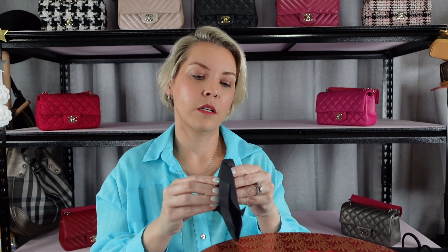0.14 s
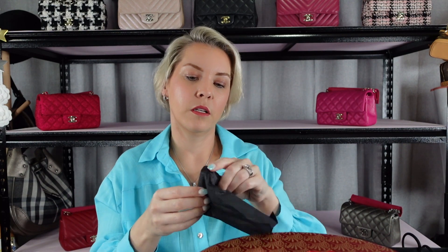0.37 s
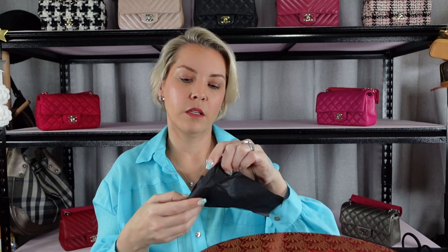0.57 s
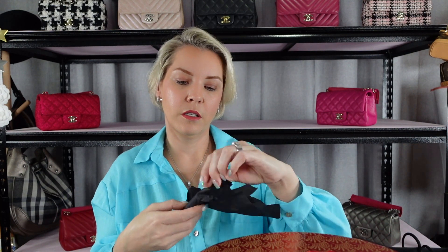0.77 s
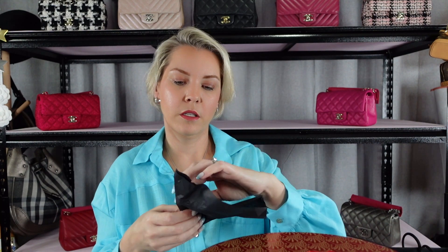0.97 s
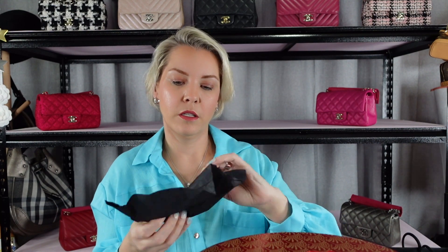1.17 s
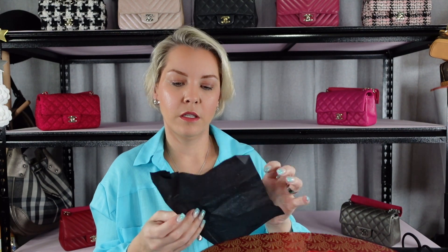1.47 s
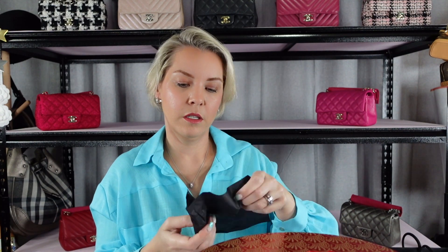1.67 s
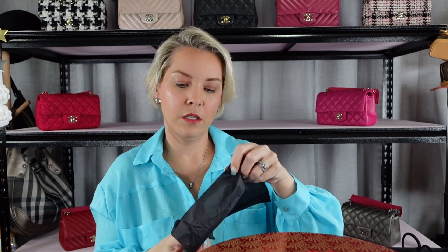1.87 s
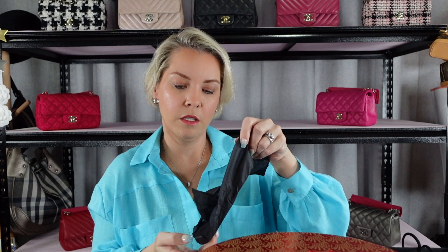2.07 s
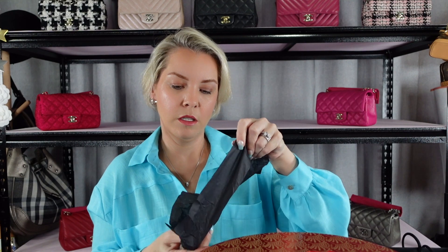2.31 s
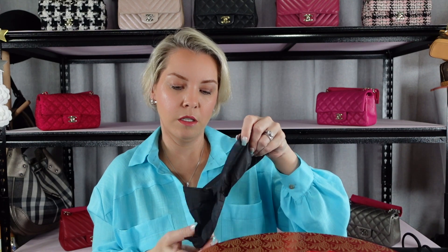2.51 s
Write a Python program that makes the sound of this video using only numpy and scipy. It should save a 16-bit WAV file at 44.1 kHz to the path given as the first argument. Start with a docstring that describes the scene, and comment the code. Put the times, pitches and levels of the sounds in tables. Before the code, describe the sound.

Dry, bright paper rustle in uneven flurries, with tiny pops and sharp crease snaps, drops away for a moment, then surges strongly and continues fuller; close pickup, short indoor reflections, very faint low room rumble.

```python
"""A sheet of thin tissue paper is unfolded by hand in a small room, with a brief pause before the widest pull.
Creases buckle in flurries of random impulses through damped resonators, over the filtered noise of sliding layers.
Middling creases pop singly; stiff ones snap and set off runs of smaller snaps. Pockets of air between layers resonate.
The bass grows fuller towards the end; reflections shift as the sheet moves, over a low room rumble."""
import sys
import numpy as np
from scipy import signal
from scipy.fft import rfft, irfft
from scipy.io import wavfile

SR = 44100
rng = np.random.default_rng(int(sys.argv[2]) if len(sys.argv) > 2 else 0)


def bounce(signal):
    """Save signal as a 16-bit WAV file at the path given by the first command-line argument."""
    frames = np.transpose(np.atleast_2d(signal))
    limited = np.clip(frames, -1, 1)
    pcm = np.round(limited * 32767).astype(np.int16)
    wavfile.write(sys.argv[1], SR, pcm)


N = 116865

# How hard the hands work the sheet. Each row: time in seconds, relative level of the rustle in dB.
MOVES = [(0.0, -33.5), (0.08, -38), (0.174, -37.5), (0.194, -34), (0.25, -29), (0.285, -28.5),
         (0.355, -27.5), (0.409, -39.5), (0.42, -31.5), (0.47, -34), (0.492, -29), (0.56, -34.5),
         (0.564, -30), (0.6, -33), (0.663, -30), (0.709, -34), (0.765, -43), (0.799, -44), (0.812, -36.5),
         (0.818, -27.5), (0.922, -43.5), (0.926, -35), (0.956, -34), (0.962, -40), (0.99, -48.5),
         (1.001, -33.5), (1.069, -31), (1.18, -32), (1.238, -26.5), (1.3, -29), (1.35, -36), (1.428, -30),
         (1.484, -48), (1.525, -48), (1.541, -57), (1.558, -46), (1.6115, -49.5), (1.613, -23.5),
         (1.624, -26.5), (1.634, -18.5), (1.638, -28.5), (1.654, -18), (1.684, -25), (1.72, -26),
         (1.744, -22.5), (1.785, -29), (1.799, -25.5), (1.806, -21), (1.824, -21), (1.832, -16.5),
         (1.842, -18.5), (1.853, -24), (1.947, -29), (1.963, -26), (2.056, -24), (2.072, -32), (2.102, -31),
         (2.138, -41), (2.16, -36), (2.18, -29.5), (2.204, -38.5), (2.224, -24.5), (2.24, -30.5),
         (2.256, -30.5), (2.272, -20), (2.279, -24.5), (2.297, -25), (2.31, -27), (2.372, -28.5),
         (2.404, -25.5), (2.41, -26.5), (2.489, -34.5), (2.5, -30.5), (2.537, -28.5), (2.571, -38.5),
         (2.579, -30), (2.617, -29.5), (2.649, -34)]

# Buckling: rate at an effort of -30 dB, its exponential growth per dB of effort, scatter of sizes.
BUCKLES_PER_S, RATE_PER_DB, SIZE_SPREAD_DB = 9000, 0.0146, 3
FEWEST_PER_S = 90  # added to the rate at every crease size, so that even the largest flip often
SMALL_BIAS = 1.15  # small, high creases outnumber large, low ones by this power of their pitch
CREASE_Q, SNAP_Q = 1.72, 1.86  # sharpness of small creases; of pops and snaps
CRACKLE_DB, SLIDE_DB = -1.5, -6  # buckling and sliding, against the effort
FLURRY_PER_S, FLURRY_S, FLURRY_DB = 260, 0.0024, 1.5  # flurries through the whole sheet: rate, decay, depth
PATCH_PER_S, PATCH_S, PATCH_DB = 240, 0.0024, 2  # flurries among creases of one size: rate, decay, depth

# Single pops: rate, level against the effort, scatter either way, range of pitches.
POPS_PER_S, POP_DB, POP_SPREAD_DB = 110, 6.5, 1
POP_LOW_HZ, POP_HIGH_HZ = 1360, 12200
FLIP_Q = 0.39  # the flip itself is one abrupt swing of the paper

SNAP_DB = -5.5  # level of all snaps
RUN_S, RUN_DB, RUN_PER_S, RUN_Q = 0.0017, -5.5, 12000, 1.3  # run after a snap: decay, level, density, sharpness
FIZZ_HZ, FIZZ_Q, FIZZ_DB = 10200, 1.8, -1  # tiny high creases that join each run

POCKET_Q, POCKET_DB = 5.6, -10.5  # sharpness of the air pockets; their level against the plain rustle
# The folded layers swallow a share of one band until the sheet opens.
FOLD_HZ, FOLD_Q, FOLD_SHARE, OPENS_S = 2580, 3.5, 0.21, 1.25

ROOM_DB, ROOM_T60_S, ROOM_DAMP_HZ, ROOM_DELAY_S = -17, 0.18, 7400, 0.0035  # a small, furnished room
ROOM_SHIFT_S = 0.2577  # the moving sheet meets a new pattern of reflections this often
ROOM_TONE_DB = -52
TOP_HZ = 15750


def rustle(count=13):
    """Buckling as shot noise: random impulses excite damped resonances, denser under effort, over sliding noise."""
    # Colour against the usual one. Each row: time in seconds, bass in dB, middle in dB, treble in dB.
    tint_rows = [(0.0, -4.5, 2, 6), (0.25, -2.5, 2, 2), (0.461, -2, 3.5, 0.8), (0.503, -6.5, -3, 1.2),
                 (0.605, 2.5, 2, 1), (0.682, -4, 7.5, 4.5), (0.742, 0.5, 2.5, 2.5), (0.982, 0.5, -0.5, 0.2),
                 (1.042, -5.5, -2.5, -0.5), (1.113, -2.5, 5.5, 0.7), (1.263, -1.5, -1, 1.5),
                 (1.299, -9, 6, -6), (1.335, 2, -2.5, -0.5), (1.628, -1, -3.5, 2.5), (1.76, 2.5, 2.5, 1.3),
                 (2.209, 2.2, -2, 3), (2.257, 2.5, 4.5, 1), (2.329, -1.3, -3.5, -1), (2.395, 2, 4.5, 0),
                 (2.448, 2.5, -3.5, 1.3), (2.646, 5.5, -3, 1.5)]
    # Centres in Hz of the bass, the middle, the unchanging band above it and the treble.
    tint_hz = (550, 1700, 4000, 8500)
    # What the paper radiates. Each row: frequency in Hz, filter gain in dB.
    paper_gain = [(120, -2.5), (170, -10.5), (230, -7), (310, -6.5), (460, -1.5), (700, -3.5), (1400, -1),
                  (2200, -1.3), (3900, -0.5), (6200, -4), (7700, 0), (9500, -3.5), (12400, -3),
                  (14300, -10), (15800, -14)]

    effort_db = curve(MOVES)
    rate = BUCKLES_PER_S * np.exp(RATE_PER_DB * (effort_db + 30))
    centres = np.geomspace(220, 14500, count)  # Hz, one for each crease size
    shares = centres ** SMALL_BIAS / np.sum(centres ** SMALL_BIAS)
    bass, middle, treble = [curve(tint_rows, axis=k) for k in (1, 2, 3)]
    tints_db = np.array([bass, middle, np.zeros(N), treble])

    crackle, slide = 0, 0
    for hz, share in zip(centres, shares):
        chance = (rate * share + FEWEST_PER_S) / SR  # of a flip at each sample
        size = undb(SIZE_SPREAD_DB * np.minimum(rng.standard_normal(N), 1.5))
        size = size * rng.choice([-1, 1], N)
        patches = undb(PATCH_DB * flurries(PATCH_PER_S, PATCH_S))
        # Dividing by sqrt(chance) keeps the power steady as the density changes.
        flips = unit((rng.random(N) < chance) * size / np.sqrt(chance) * patches)
        weights = np.array([np.interp(np.log(hz), np.log(tint_hz), row) for row in np.eye(len(tints_db))])
        tint = undb(weights @ tints_db)
        crackle = crackle + tint * ring(flips, hz, CREASE_Q)
        slide = slide + tint * ring(rng.standard_normal(N), hz, CREASE_Q)

    crackle = crackle * undb(FLURRY_DB * flurries(FLURRY_PER_S, FLURRY_S))
    crackle = undb(CRACKLE_DB) * unit(colour(crackle, paper_gain))
    slide = undb(SLIDE_DB) * unit(colour(slide, paper_gain))
    return undb(effort_db) * (crackle + slide)


def flurries(rate, decay_s):
    """Clustering: random kicks through an exponential decay give surges of mean near 0 and rms 1, peaks capped."""
    kicks = (rng.random(N) < rate / SR) * (.5 + rng.random(N))
    surge = signal.lfilter([1], [1, -np.exp(-1 / (decay_s * SR))], kicks)
    return unit(np.minimum(unit(surge - surge.mean()), 2))


def pops(count=600, size=256):
    """A Poisson process: single creases pop after exponential waits, each at its own pitch, above the rustle."""
    out, effort_db = np.zeros(N + size), curve(MOVES)
    wait, pitch, strength = rng.random((count, 3)).T
    starts = (np.cumsum(-np.log(1 - wait)) / POPS_PER_S * SR).astype(int)
    for i, p, s in zip(starts, pitch, strength):
        if i < N:
            hz = POP_LOW_HZ * (POP_HIGH_HZ / POP_LOW_HZ) ** np.sqrt(p)  # the root favours high pitches
            level_db = effort_db[i] + POP_DB + POP_SPREAD_DB * (2 * s - 1)
            out[i:i + size] += undb(level_db) * pop(hz, size=size)
    return out[:N]


def pop(hz, size=256):
    """Impulse response of a bistable crease: one abrupt swing, then a brief ring at its own pitch; peak 1."""
    swing = ring(signal.unit_impulse(size), hz, FLIP_Q)
    y = ring(swing, hz, SNAP_Q)
    return y / np.abs(y).max()


def snaps(size=2048):
    """Snap-through instability: a stiff crease pops and sets off a quickly dying run, some alike, some tiny."""
    # Stiff creases. Each row: start in seconds, relative peak in dB, ring in Hz,
    # relative level in dB of the run of smaller snaps after it.
    stiff_creases = [(0.0576, -20, 8500, -18), (0.109, -17.5, 9000, 1), (0.1494, -20, 4800, -5),
                     (0.1952, -18, 5000, 4.5), (0.206, -21, 5000, -20), (0.2465, -17, 7500, 4),
                     (0.2729, -0.5, 5400, -10), (0.276, -3, 7400, -4), (0.3098, -10, 11000, -1.5),
                     (0.3338, -6.5, 10700, -12), (0.3558, -11, 2980, -10), (0.3852, -15, 12000, -2),
                     (0.423, -18, 1810, -3), (0.4325, -12.5, 7000, 0), (0.449, -15, 7800, -4),
                     (0.4877, -7, 7500, -5), (0.6932, -13, 4400, -3), (0.7081, -6, 11000, -8),
                     (0.791, -18.5, 3120, -26), (.8165, -18, 7300, 0), (0.835, -17, 1600, -24),
                     (0.9257, -17.5, 4170, 1), (0.9537, -18.5, 1570, -2), (1.0143, -17, 3000, -2),
                     (1.054, -11, 7700, -7), (1.078, -19, 5660, 5), (1.172, -11, 4800, -5),
                     (1.236, -17, 7640, 3.5), (1.252, -8, 3380, -7), (1.2921, -2, 2340, -20),
                     (1.2942, -8, 5500, -12), (1.3348, -10.5, 1850, -4), (1.3552, -12, 2800, -3),
                     (1.3887, -10.5, 8000, -8), (1.4255, -12, 4100, -2.5), (1.5043, -25.5, 2300, 1),
                     (1.515, -25.5, 3300, -4), (1.529, -27, 2130, -4), (1.5915, -26.5, 4130, -3),
                     (1.6128, -11.5, 9000, 2), (1.631, -12, 6600, -13), (1.6312, -6.5, 7900, 0),
                     (1.6535, -7.5, 3600, 1.5), (1.7417, -8.5, 4540, -3), (1.8298, -1, 4760, -14),
                     (1.8413, 0, 7500, -7), (1.8669, -9, 4100, -11), (1.884, -7, 5700, -6),
                     (2.1658, -17, 9700, -12), (2.2128, -21.5, 4000, -1), (2.2560, -15, 4200, -1),
                     (2.2715, -16, 4600, 5), (2.2980, -9, 4270, -3), (2.3246, -8.5, 2860, -4.5),
                     (2.3491, -1.5, 4500, -12), (2.402, -5.5, 3050, -9), (2.4036, -8, 10400, -12),
                     (2.539, -11, 4030, -4)]
    out, t = np.zeros(N + size), np.arange(size) / SR
    for start, db, hz, run_db in stiff_creases:
        signs = rng.choice([-1, 1], (2, size))
        alike, tiny = signs * (rng.random((2, size)) < RUN_PER_S / SR)
        alike = unit(ring(ring(alike, hz, RUN_Q), hz, RUN_Q))
        fizz = undb(FIZZ_DB) * unit(ring(tiny, FIZZ_HZ, FIZZ_Q))
        run = undb(run_db + RUN_DB) * (alike + fizz) * np.exp(-t / RUN_S)
        i = int(start * SR)
        out[i:i + size] += undb(db + SNAP_DB) * (pop(hz, size=size) + run)
    return out[:N]


def folds(x):
    """Cavity resonance and absorption: air pockets ring and give way to each other; folded layers sound hollow."""
    # Air pockets between the layers. Each row: time in seconds when fully formed, resonance in Hz.
    air_pockets = [(0.1, 1150), (0.36, 1320), (0.68, 1990), (1.45, 2080), (1.62, 3680), (1.75, 3480),
                   (2.0, 1390), (2.35, 2230)]
    t = np.arange(N) / SR
    times, pitches = np.array(air_pockets).T
    pockets = 0
    for here, hz in zip(np.eye(len(times)), pitches):
        presence = np.interp(t, times, here)  # crossfades with the neighbours
        pockets = pockets + presence * ring(x, hz, POCKET_Q)
    swallowed = FOLD_SHARE * (t < OPENS_S) * ring(x, FOLD_HZ, FOLD_Q)
    return x + undb(POCKET_DB) * pockets - swallowed


def room(x, size=16384):
    """Reverberation as convolution with decaying, dulled noise; its pattern crossfades as the sheet moves."""
    t, out = np.arange(size) / SR, 0
    fade = undb(-60 * t / ROOM_T60_S) * (t > ROOM_DELAY_S)
    place = np.arange(N) / SR / ROOM_SHIFT_S
    for k in range(int(place[-1]) + 2):
        tail = lowpass(rng.standard_normal(size), ROOM_DAMP_HZ, order=1) * fade
        here = np.sqrt(np.maximum(1 - np.abs(place - k), 0))  # equal-power crossfade
        out = out + signal.fftconvolve(x * here, tail / np.linalg.norm(tail))[:N]
    return undb(ROOM_DB) * out


def room_tone():
    """Stationary background noise: white noise shaped into low rumble and faint hiss."""
    # The room's own spectrum. Each row: frequency in Hz, relative density in dB per Hz.
    tone_density = [(20, -3), (38, -3), (70, -1), (110, -6.5), (240, -5.5), (500, -10), (1000, -9),
                    (4000, -17.5), (16000, -75)]
    return undb(ROOM_TONE_DB) * unit(colour(rng.standard_normal(N), tone_density))


def undb(db):
    """The decibel law: level to amplitude gain."""
    return 10 ** (np.asarray(db) / 20)


def unit(x):
    """Power normalisation: scale to rms 1."""
    return x / np.sqrt(np.mean(x ** 2))


def curve(rows, axis=1):
    """Linear interpolation: one column of a table, joined by straight lines in time."""
    rows = np.array(rows)
    rows = rows[np.argsort(rows[:, 0], kind="stable")]
    return np.interp(np.arange(N) / SR, rows[:, 0], rows[:, axis])


def lowpass(x, hz, order=2):
    """Butterworth low-pass: maximally flat below its cutoff."""
    return signal.sosfilt(signal.butter(order, min(hz, SR / 2 - 1), fs=SR, output="sos"), x)


def ring(x, hz, q):
    """A damped second-order resonance, gain 1 at its centre."""
    w = 2 * np.pi * min(hz, SR / 2 - 1) / SR
    a = np.sin(w) / (2 * q)
    return signal.lfilter([a, 0, -a], [1 + a, -2 * np.cos(w), 1 - a], x)


def colour(x, points, size=4096):
    """Minimum-phase filter through (Hz, dB) points: a folded cepstrum makes it causal, so clicks stay sharp."""
    hz, db = np.array(points).T
    f = np.maximum(np.fft.rfftfreq(size, 1 / SR), 1)
    gain = undb(np.interp(np.log(f), np.log(hz), db))
    gain = gain * np.minimum(f / hz[0], 1) ** 2  # falls by 12 dB per octave below the first point
    cepstrum = irfft(np.log(gain))
    cepstrum[1:size // 2] *= 2
    cepstrum[size // 2 + 1:] = 0
    return signal.fftconvolve(x, irfft(np.exp(rfft(cepstrum))))[:N]


def scene():
    """Superposition of the paper, its reflections and the room tone."""
    paper = folds(rustle() + pops()) + snaps()
    return (paper + room(paper) + room_tone())[None]


def record(dry):
    """Band limitation: a steep elliptic low-pass cuts the top."""
    return signal.sosfilt(signal.ellip(10, .1, 80, TOP_HZ, fs=SR, output="sos"), dry)


dry = scene()
out = record(dry)
bounce(out)
```